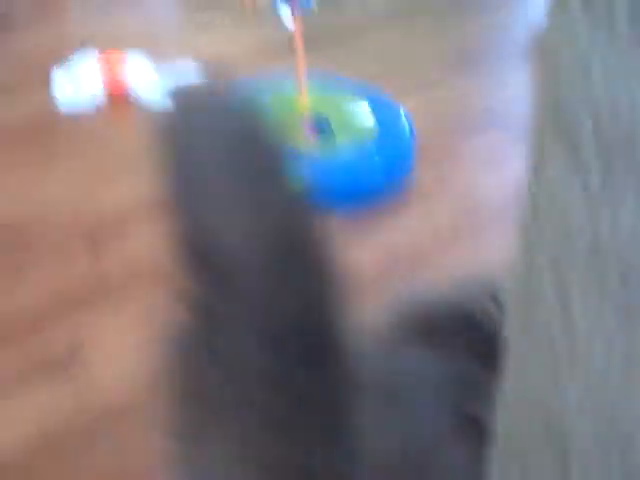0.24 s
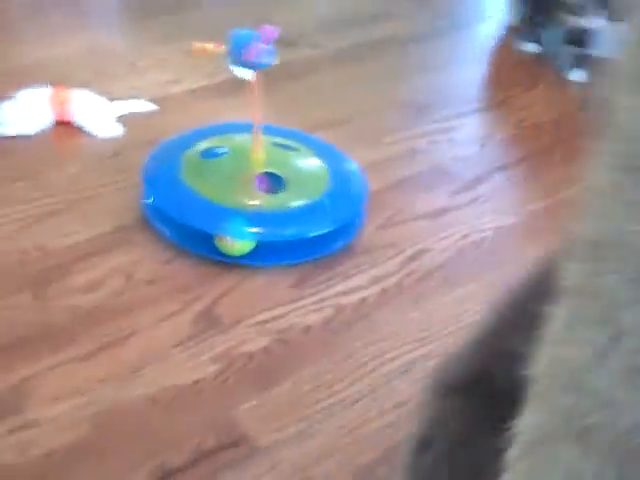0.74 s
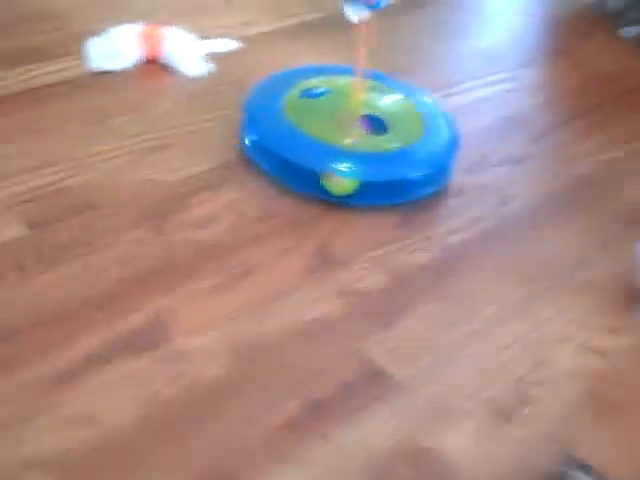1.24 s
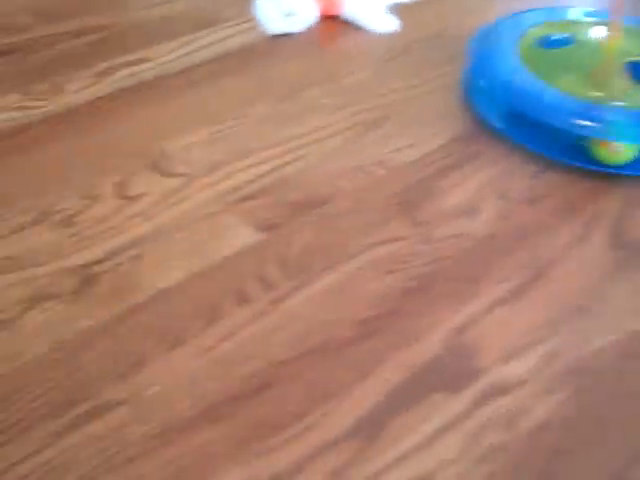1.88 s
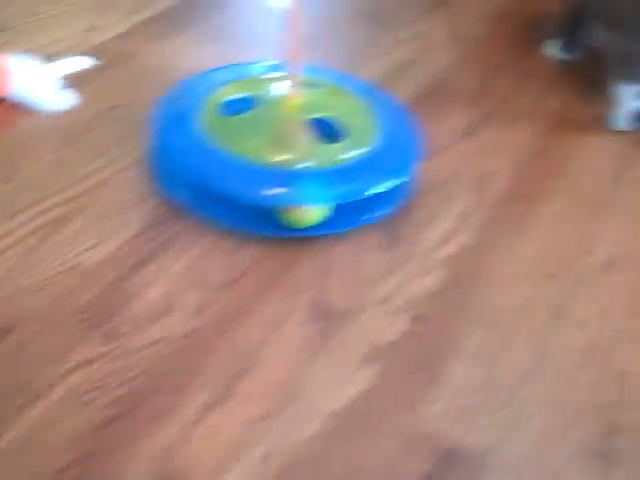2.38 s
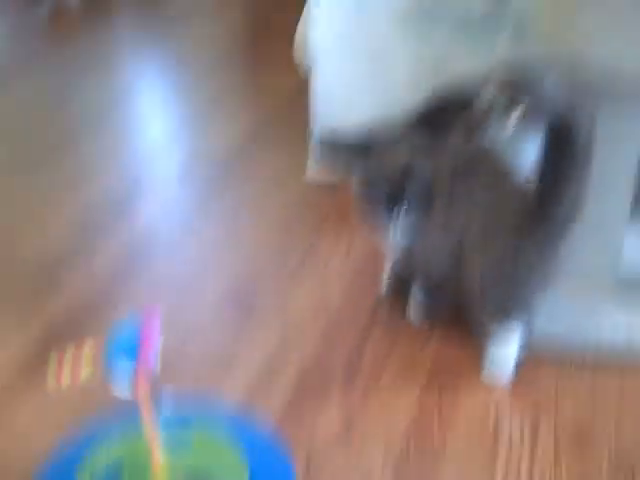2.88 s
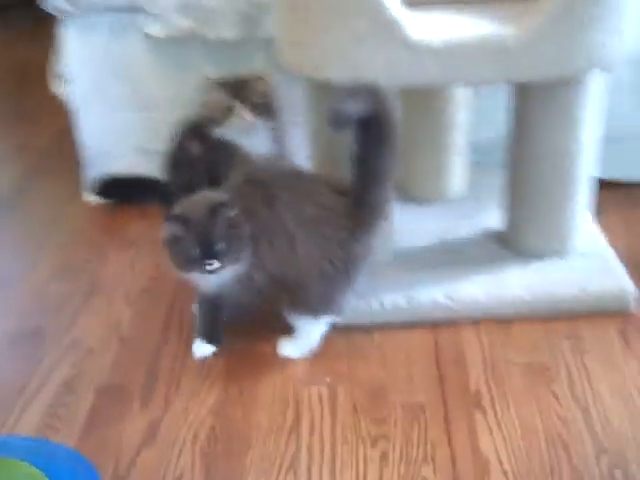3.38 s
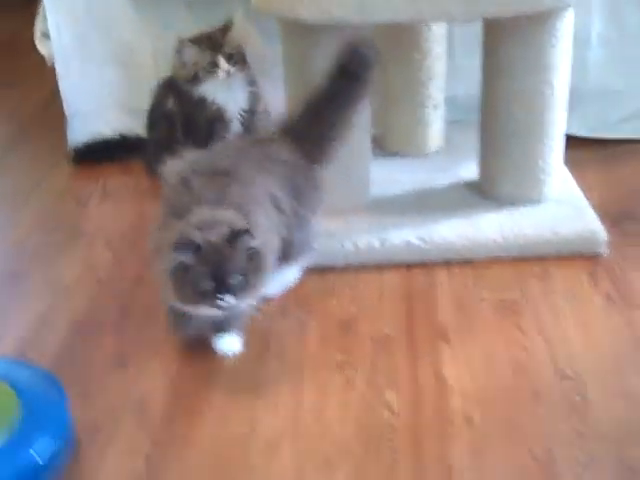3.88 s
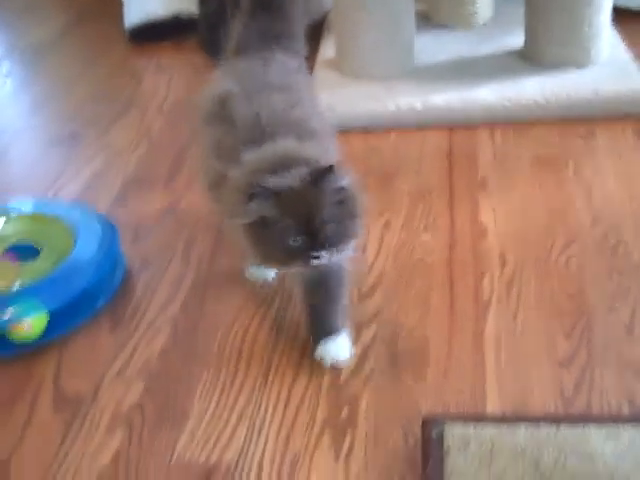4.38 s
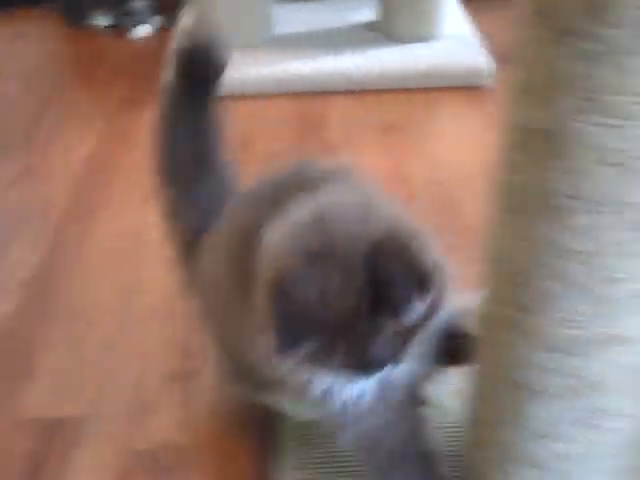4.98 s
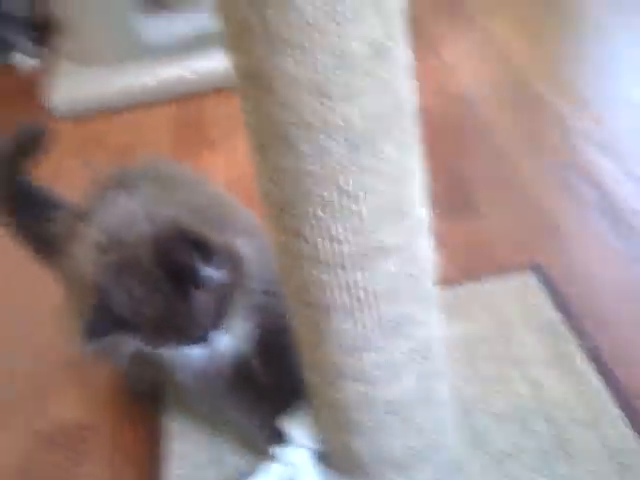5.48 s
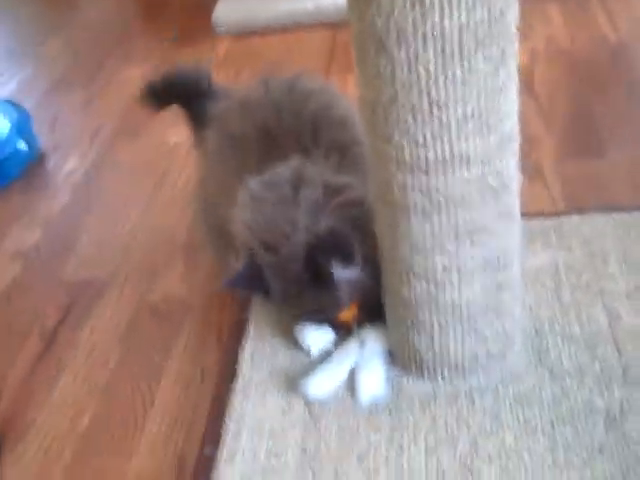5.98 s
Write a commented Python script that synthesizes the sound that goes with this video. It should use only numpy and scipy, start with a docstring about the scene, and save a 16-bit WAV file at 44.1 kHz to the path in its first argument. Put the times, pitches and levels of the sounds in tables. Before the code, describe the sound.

A quiet indoor room with a wooden floor. Faint hush, small hollow toy bumps and a soft sinking swish come first. Then stiff feather fibres drag over the microphone's body, crackling brightly with low thumps. They thin out, pause, and a loud hard snap brings a burst of scraping that dwindles into sparse ticks.

```python
"""In a quiet room with a wooden floor, kittens play while a feather toy is waved close to the camera.
Its stiff fibres drag over the camera body: stick-slip friction crackles in noise bursts coloured by the shell.
One hard snap rings the body's low modes; under hard contacts the overloaded preamp thumps and recovers slowly.
Also heard are a hollow toy's modal bumps, swells of band noise and a sinking swish of filtered noise, a faint
electrical throb of decaying steps, and a hush of shaped noise."""
import sys
import numpy as np
from scipy import signal
from scipy.fft import rfft, irfft
from scipy.io import wavfile
from scipy.ndimage import uniform_filter1d

SR = 44100
rng = np.random.default_rng(int(sys.argv[2]) if len(sys.argv) > 2 else 0)


def persist_wave(psi):
    """Save psi, clipped to +-1, as 16-bit WAV."""
    counts = np.round(np.clip(psi, -1, 1) * 32767).astype(np.int16)
    wavfile.write(sys.argv[1], SR, np.atleast_2d(counts).T)


N = 275184
TIME = np.arange(N) / SR


def from_db(db):
    """Logarithmic level: 20 dB is a tenfold amplitude."""
    return 10 ** (np.asarray(db) / 20)


def rms_one(x):
    """Power normalisation: scale to an rms of 1."""
    return x / np.sqrt(np.mean(x ** 2, axis=-1, keepdims=True) + 1e-20)


def in_time(rows):
    """Linear interpolation: each column of a curve at every sample."""
    s, *columns = np.transpose(rows)
    return [np.interp(TIME, s, column) for column in columns]


def cut(x, hz, kind, order=2):
    """Causal Butterworth filtering, low- or high-pass."""
    sos = signal.butter(order, min(hz, .47 * SR), kind, fs=SR, output="sos")
    return signal.sosfilt(sos, x + 1e-18)


def resonate(x, hz, width_hz):
    """Resonance: a band-pass with gain 1 at its centre."""
    return signal.lfilter(*signal.iirpeak(hz, hz / width_hz, fs=SR), x + 1e-18)


def peak(x, hz, width_hz, db):
    """Resonant gain: lift the band around one resonance."""
    return x + (from_db(db) - 1) * resonate(x, hz, width_hz)


def ring(x, hz, t60):
    """Damped oscillation: a unit click starts a decaying sine of initial height 1."""
    radius, angle = np.exp(-np.log(1000) / (t60 * SR)), 2 * np.pi * hz / SR
    return signal.lfilter([0, np.sin(angle)], [1, -2 * radius * np.cos(angle), radius ** 2], x + 1e-18)


def fade(x, decay_s):
    """Exponential relaxation: every click leaves a dying tail."""
    return signal.lfilter([1], [1, -np.exp(-1 / (decay_s * SR))], x + 1e-18)


def clicks(times, heights):
    """Impulse excitation: single-sample clicks at the given times."""
    out = np.zeros(N)
    out[np.round(np.asarray(times) * SR).astype(int)] = heights
    return out


ROOM_T60_S = 0.56


def room(x, wall_hz):
    """Diffuse reverberation: dull, decaying noise that starts after the first wall."""
    t = TIME[:SR // 2]
    noise = cut(rng.standard_normal(len(t)), wall_hz, "low", order=1)
    tail = noise * from_db(-60 * t / ROOM_T60_S) * (t > .006)
    return signal.fftconvolve(x, tail / np.linalg.norm(tail))[:N]


# Level of the room and microphone hush. Each row: time in seconds, rms level in dB.
HUSH_LEVEL = [(0, -60.5), (0.5, -63), (1.0, -62.5), (2.0, -60.5), (3.6, -63.5), (4.2, -69), (4.85, -66.5),
              (5.5, -67), (6.24, -67.5)]
# Spectrum of the hush. Each row: frequency in Hz, relative spectral level in dB.
HUSH_SPECTRUM = [(18, -47), (30, 1.5), (259, -2.5), (394, 1), (649, -3.5), (1100, -2.5), (1250, -4.5),
                 (1590, -2), (1960, -5), (4190, -10.5), (4530, -11), (4910, -12.5), (16000, -22)]


def air():
    """Spectrally shaped noise: the hush of room and microphone, its level drifting slowly."""
    hz, db = np.transpose(HUSH_SPECTRUM)
    bins = np.maximum(np.fft.rfftfreq(N, 1 / SR), 1)
    gain = from_db(np.interp(np.log(bins), np.log(hz), db))
    noise = irfft(rfft(rng.standard_normal(N)) * gain, N)
    return from_db(in_time(HUSH_LEVEL)[0]) * rms_one(noise)


THROB_HZ = 29.3  # the picture rate
# Runs of electrical throb. Each row: start in seconds, end in seconds, mid-run step before smoothing in dB.
THROB_RUNS = [(4.204, 4.66, -54.5), (5.474, 6.21, -54)]


def throb(settle_s=0.097, edge_hz=300.0, growth_db=8.5):
    """Charge leakage: voltage steps, one per picture, grow through each run and decay exponentially."""
    steps = 0
    for start, end, db in THROB_RUNS:
        s = np.arange(start, min(end, TIME[-1]), 1 / THROB_HZ)
        growth = growth_db * np.linspace(-.5, .5, len(s))
        steps = steps + clicks(s, -from_db(db + growth))
    return cut(fade(steps, settle_s), edge_hz, "low", order=1)


# Swells of band noise: faint scuffs, coloured patches within the rub, and a dull tail after the snap.
# Each row: middle in seconds, Gaussian half length in seconds, level at the middle in dB,
# centre frequency in Hz, bandwidth in Hz.
NOISE_SWELLS = [(0.023, 0.065, -64, 2600, 3420), (0.70, 0.062, -66, 4500, 5000),
                (1.27, 0.15, -59, 1850, 640), (1.23, 0.077, -61.5, 380, 260), (1.36, 0.043, -63, 130, 100),
                (1.496, 0.061, -58.5, 4000, 8700), (1.83, 0.12, -57.5, 4200, 4850),
                (2.09, 0.008, -37, 8800, 1400), (2.247, 0.036, -45, 3400, 1300),
                (2.424, 0.019, -40, 3200, 1300), (2.522, 0.018, -38.5, 4700, 700),
                (4.028, 0.1, -57, 4100, 1084), (5.09, 0.086, -53, 750, 700), (5.45, 0.22, -71, 2900, 1628)]


def noise_swells():
    """Band-pass noise: Gaussian swells, each around its own pitch, with little below it."""
    out = np.zeros(N)
    for middle, half_s, db, hz, width_hz in NOISE_SWELLS:
        swell = np.exp(-((TIME - middle) / half_s) ** 2 / 2)
        noise = cut(resonate(rng.standard_normal(N), hz, width_hz), hz / 3, "high")
        out += from_db(db) * swell * rms_one(noise)
    return out


# A hollow swish. Each row: time in seconds, centre frequency in Hz, level in dB.
SWISH_GLIDE = [(1.72, 1700, -85), (1.81, 1613, -62), (1.87, 1350, -64), (1.895, 1006, -73),
               (1.925, 843, -55.5), (2.0, 804, -63.5), (2.06, 880, -76)]


def swish(width_hz=77.0):
    """Narrow-band noise on a moving carrier: its centre sinks, then turns up slightly at the end."""
    hz, db = in_time(SWISH_GLIDE)
    sounding = (TIME > SWISH_GLIDE[0][0]) & (TIME < SWISH_GLIDE[-1][0])
    flutter = cut(rng.standard_normal((2, N)), width_hz, "low")
    phase = 2 * np.pi * np.cumsum(hz) / SR
    band = flutter[0] * np.cos(phase) + flutter[1] * np.sin(phase)
    return sounding * from_db(db) * rms_one(band)


# Touches of the hollow toy on the floor. Each row: time in seconds, strength in dB.
TOUCHES = [(0.404, -54), (0.423, -53), (1.197, -59), (1.335, -71), (2.864, -40.5), (2.873, -56),
           (2.882, -38), (2.894, -39.5), (3.656, -49), (3.679, -53.5)]
# Modes of the hollow toy. Each row: frequency in Hz, level relative to the touch in dB, T60 in seconds.
TOY_MODES = [(144, -14.5, 0.092), (289, 1.5, 0.065), (345, 4.5, 0.017), (488, 2, 0.019), (647, -14, 0.17),
             (725, -7.5, .05), (860, -11.5, 0.11)]


def bumps(wet_db=-11.0):
    """Modal excitation: a hollow toy knocks on the boards; each touch strikes the modes a little differently."""
    s, db = np.transpose(TOUCHES)
    chance_db = 2 * rng.standard_normal((len(s), len(TOY_MODES)))
    out = np.zeros(N)
    for k, (hz, mode_db, t60) in enumerate(TOY_MODES):
        hits = clicks(s, from_db(db + mode_db + chance_db[:, k]))
        out += (-1) ** k * ring(hits, hz, t60)
    return out + from_db(wet_db) * room(out, wall_hz=2000)


# Low thumps under hard contacts. Each row: time in seconds, nominal pulse strength in dB.
OVERLOADS = [(2.1349, -30), (2.2511, -34), (2.3435, -44), (2.4575, -27), (2.5223, -30), (2.5415, -24),
             (2.6402, -28), (2.7276, -34), (2.7396, -26), (2.7683, -38), (2.8585, -38), (3.0161, -41),
             (3.2536, -44), (3.4374, -28), (4.6623, -48), (4.9352, -20), (4.9433, -24), (4.9495, -26),
             (4.9636, -30), (4.9797, -33), (4.9953, -38)]


def overload_thumps(pulse_hz=960.0, recovery_db=-22.5, recovery_s=0.092):
    """Asymmetric overload: the preamp gives a short, mostly one-sided pulse and recovers slowly."""
    s, db = np.transpose(OVERLOADS)
    hits = clicks(s, from_db(db))
    pulse = cut(hits, pulse_hz, "low") * SR / (2 * pulse_hz)
    recovery = cut(fade(hits, recovery_s), 270, "low", order=1)
    return pulse + from_db(recovery_db) * recovery


SNAP_S, SNAP_DB = 4.9324, -14.5
# Body modes struck by the snap. Each row: frequency in Hz, level relative to SNAP_DB in dB, T60 in seconds.
BODY_MODES = [(130, -16, .025), (260, -10, .019), (480, -7.5, .014), (810, -4.5, .014), (1280, -4.5, .011),
              (1720, -5, .008), (2800, -9, .007)]


def snap(crack_db=-17.5, crack_s=0.0015, crack_top_hz=7030.0,
         shove_db=-19.0, shove_hz=474.0, shove_after_s=0.0009):
    """Impact: a hard blow shoves the body, rings its low modes and cracks for a few milliseconds."""
    hit = clicks([SNAP_S], 1.0)
    body = np.zeros(N)
    for k, (hz, db, t60) in enumerate(BODY_MODES):
        body += (-1) ** (k + 1) * from_db(SNAP_DB + db) * ring(hit, hz, t60)
    shove = clicks([SNAP_S + shove_after_s], from_db(shove_db))
    body -= cut(shove, shove_hz, "low") * SR / (2 * shove_hz)
    swell = fade(fade(hit, crack_s), crack_s)
    noise = rms_one(cut(rng.standard_normal(N), crack_top_hz, "low", order=1))
    return body + from_db(crack_db) * noise * swell / swell.max()


SHELL_TOP_HZ = 13300
# Resonances of the plastic shell. Each row: frequency in Hz, bandwidth in Hz, lift before stirring in dB.
SHELL_MODES = [(1930, 3400, 4.5), (3030, 2000, 5.5), (4330, 310, 3.5), (8050, 240, 8), (9020, 93, 5.5),
               (12520, 2150, 10)]


def shell(force, stir_db, bass_hz):
    """Resonant transmission: mids and treble of rms 1; the contact point stirs each mode by stir_db."""
    for (hz, width_hz, db), extra_db in zip(SHELL_MODES, stir_db):
        force = peak(force, hz, width_hz, db + extra_db)
    out = cut(cut(force, bass_hz, "high"), SHELL_TOP_HZ, "low", order=3)
    mids, treble = cut(out, 6000, "low", order=3), cut(out, 6000, "high", order=3)
    return rms_one(mids), rms_one(treble)


def blend(mids, treble, bright_db):
    """Power addition: mix the two registers at constant power."""
    gain = from_db(bright_db)
    return (mids + gain * treble) / np.sqrt(1 + gain ** 2)


ATTACK_S, RELEASE_DB_PER_S = 0.0058, 142.5  # the fibres catch at once and let go gradually
# Strokes of the feather over the camera. Each row: start in seconds, end in seconds, level at the start
# in dB, level at the end in dB, treble over mids in dB, crackle over rub in dB (before their trims).
FEATHER_STROKES = [(2.047, 2.37, -38.5, -40.5, 5, -6.5), (2.418, 2.53, -32, -34, 10, 2.5),
                   (2.546, 2.669, -32, -41.5, 12.5, 0.5), (2.717, 3.05, -39.5, -45.5, 11, 4),
                   (3.045, 3.302, -36.5, -38, 12, -1), (3.33, 3.918, -47, -55, 8.5, 11.5),
                   (4.084, 4.165, -53, -59.5, 5.5, 8), (4.206, 4.491, -67, -69, -0.5, 3.5),
                   (4.505, 4.57, -66, -56, -1.5, 11), (4.573, 4.656, -45, -41, 9.5, -4),
                   (4.93, 5.122, -28.5, -40.5, 5.5, 3.5), (5.114, 5.438, -43.5, -49.5, -4, 7.5),
                   (5.49, 5.73, -54.5, -58.5, -4.5, 5), (5.75, 5.95, -54, -61.5, 2, 10)]


def strokes(t):
    """Contact envelope: level, brightness and crackle at times t; the strongest stroke sets them."""
    columns = np.transpose(FEATHER_STROKES)[:, :, None]
    start, end, first_db, last_db, bright_db, crackle_db = columns
    caught = np.clip((t - start) / ATTACK_S, 1e-4, 1)
    progress = np.clip((t - start) / (end - start), 0, 1)
    pressed_db = first_db + (last_db - first_db) * progress
    db = 20 * np.log10(caught) + pressed_db - RELEASE_DB_PER_S * np.maximum(t - end, 0)
    strongest = db.argmax(axis=0)
    return db.max(axis=0), bright_db[strongest, 0], crackle_db[strongest, 0]


def rub(per_s=380., spread_db=4.5, decay_s=0.00061, smooth_db=-6.5, level_db=-1.5,
        wander_hz=10.5, wander_db=4.5):
    """Sliding friction: tiny random slips over a smooth hiss; colour wanders with the contact point."""
    db, bright_db, _ = strokes(TIME)
    sizes = from_db(spread_db * np.minimum(rng.exponential(1, N), 3))
    slipping = rng.random(N) < per_s / SR
    power = fade(slipping * sizes ** 2, decay_s / 2)
    # even out the running power, then add the smooth hiss
    power = power / (uniform_filter1d(power, size=2000) + 1e-6) + from_db(smooth_db) ** 2
    drift = cut(rng.standard_normal((len(SHELL_MODES), N)), wander_hz, "low")
    wander = np.tanh(rms_one(drift))
    force = np.sqrt(power) * rng.standard_normal(N)
    mids, treble = shell(force, wander_db * wander, bass_hz=890)
    return from_db(db + level_db) * blend(mids, treble, bright_db)


SMALL_SLIPS_PER_S, SMALL_SLIP_SPREAD_DB, SMALL_SLIP_TREBLE_DB = 95, 3.5, -1.5
STICK_S = 0.009  # the fibres hold still this long before a loud slip


def small_slips(colour_spread_db=4.0):
    """Stick-slip friction: fibres let go at uneven intervals, following the stroke: rows like LOUD_SLIPS."""
    count = 900  # more than needed; later ones are dropped
    wait, size = rng.gamma(3, 1 / 3, count), rng.standard_normal(count)
    colour = rng.uniform(-1, 1, count)
    s = FEATHER_STROKES[0][0] + np.cumsum(wait) / SMALL_SLIPS_PER_S
    db, bright_db, crackle_db = strokes(s)
    slip_db = db + crackle_db + SMALL_SLIP_SPREAD_DB * np.clip(size, -2, 2)
    treble_db = bright_db + SMALL_SLIP_TREBLE_DB + colour_spread_db * colour
    rows = np.transpose([s, slip_db, treble_db])
    lead = np.array(LOUD_SLIPS)[:, :1] - s
    stuck = ((lead > 0) & (lead < STICK_S)).any(axis=0)
    return rows[~stuck & (s < FEATHER_STROKES[-1][1] + .15)]


SLIP_DECAY_S = 0.00056  # typical; each slip varies around it
FIBRE_DB, FIBRE_WIDTH_HZ = 5.5, 2200  # the slipping fibre lifts one band
# The loudest slips, where a stiff fibre lets go. Each row: time in seconds, level in dB,
# treble over mids in dB.
LOUD_SLIPS = [(2.1285, -28, 12), (2.1349, -21, 10), (2.1779, -29, 2), (2.2004, -26, 2), (2.2213, -28, 0),
              (2.2513, -25, 3), (2.2879, -32, 4), (2.3435, -30, 9), (2.3994, -30, -5), (2.4577, -24, 8),
              (2.5136, -26, 6), (2.5225, -24, 0), (2.5417, -24, 6), (2.5844, -26, 6), (2.6404, -23, 6),
              (2.7278, -26, 10), (2.736, -24, 6), (2.7398, -23, 5), (2.7685, -24, 11), (2.8011, -27, 9),
              (2.811, -27, 12), (2.8244, -26, 7), (2.8587, -22, 12), (2.8821, -30, 9), (2.9025, -29, 7),
              (2.9348, -31, 12), (2.9709, -29, 8), (3.0165, -26, 15), (3.071, -26, 9), (3.0883, -29, 4),
              (3.1344, -30, 9), (3.1473, -30, 15), (3.2239, -29, 9), (3.2538, -27, 7), (3.3044, -33, 8),
              (3.3409, -31, 9), (3.365, -33, 15), (3.3813, -28, 10), (3.4376, -27, 7), (3.4415, -28, 13),
              (3.4878, -28, 11), (3.5023, -32, 9), (3.5274, -30, 16), (3.5989, -35, 7), (3.6198, -33, 9),
              (3.6304, -33, 11), (3.6588, -30, 10), (3.7055, -33, 9), (3.7171, -35, 5), (3.7651, -36, 10),
              (3.7761, -34, 12), (3.8111, -41, 4), (3.832, -31, 11), (3.842, -40, 5), (3.8678, -36, 9),
              (3.9758, -39, 5), (4.1411, -42, 5), (4.2211, -52, -2), (4.4808, -52, -3), (4.5095, -44, -7),
              (4.5874, -37, 1), (4.62, -36, 1), (4.6632, -27, 10), (4.6846, -32, 3), (4.7991, -48, 1),
              (4.8686, -50, 9), (4.9352, -19, 12), (4.9435, -21, 5), (4.9497, -22, 4), (4.9567, -25, 10),
              (4.9638, -21, 3), (4.9771, -20, -3), (4.98, -19, 6), (4.9993, -25, 5), (5.0172, -28, 8),
              (5.0629, -27, 6), (5.0829, -28, 4), (5.0958, -29, 2), (5.1281, -32, -2), (5.209, -35, -1),
              (5.2183, -33, 0), (5.2359, -37, 3), (5.2551, -37, -1), (5.2893, -35, -6), (5.3225, -32, 2),
              (5.3663, -37, 5), (5.4058, -36, -8), (5.4776, -39, -4), (5.5054, -41, -4), (5.7269, -41, 5),
              (5.7756, -36, 7), (5.7941, -41, 3), (5.8384, -37, 6), (5.8967, -43, 4), (5.9462, -48, -2)]


def ticks(slips, level_db, rise_s=.00004, after_db=-18.5, after_s=0.0048):
    """Stick-slip release: each slip is a friction burst about a millisecond long, coloured by its fibre."""
    s, db, bright_db = np.transpose(slips)
    t = TIME[:1024]
    length = SLIP_DECAY_S * from_db(5.5 * np.clip(rng.standard_normal((len(s), 1)), -2, 2))
    decay = np.exp(-t / length) + from_db(after_db) * np.exp(-t / after_s)
    shape = (1 - np.exp(-t / rise_s)) * decay
    noise = shape * rng.standard_normal(shape.shape)
    fibre_hz = rng.uniform(2500, 12000, len(s))
    force = [peak(burst, hz, FIBRE_WIDTH_HZ, FIBRE_DB) for burst, hz in zip(noise, fibre_hz)]
    stir_db = 3.4 * np.clip(rng.standard_normal((len(SHELL_MODES), len(s), 1)), -2, 2)
    mids, treble = shell(np.array(force), stir_db, bass_hz=920)
    # the level is the rms of the burst's energy spread over two milliseconds
    bursts = blend(mids, treble, bright_db[:, None]) * np.sqrt(.002 / t[-1])
    bursts = bursts * from_db(db + level_db)[:, None]
    out = np.zeros(N)
    for at, burst in zip((s * SR).astype(int), bursts):
        out[at:at + len(t)] += burst
    return out


def scene():
    """Superposition: camera contacts are close and nearly dry, their bass unreverberated; the rest is added."""
    crackle = ticks(LOUD_SLIPS, level_db=0.0) + ticks(small_slips(), level_db=-1.5)
    contact = crackle + rub() + snap()
    reflected = from_db(-15.0) * room(cut(contact, 340, "high"), wall_hz=3520)
    near = contact + reflected + overload_thumps() + throb()
    return (near + bumps() + noise_swells() + swish() + air())[None]


CUTOFF_HZ = 15750


def record(dry):
    """Saturation and band limiting: the highest peaks are rounded and the top is cut."""
    top = .5
    rounded = top * np.tanh(dry / top)
    sos = signal.ellip(10, .2, 70, CUTOFF_HZ, fs=SR, output="sos")
    return signal.sosfilt(sos, rounded)


dry = scene()
out = record(dry)
persist_wave(out)
```